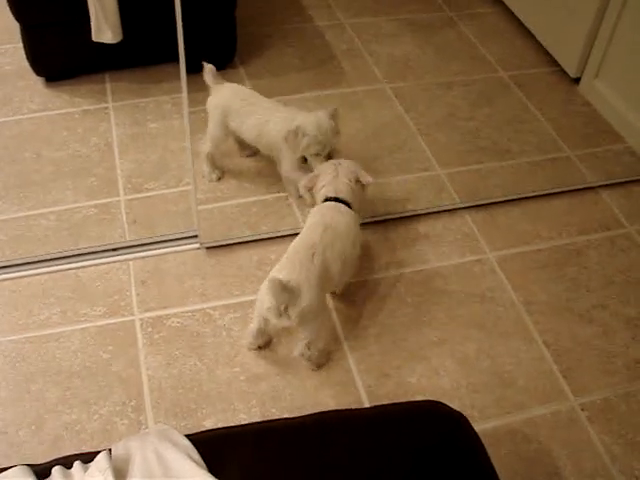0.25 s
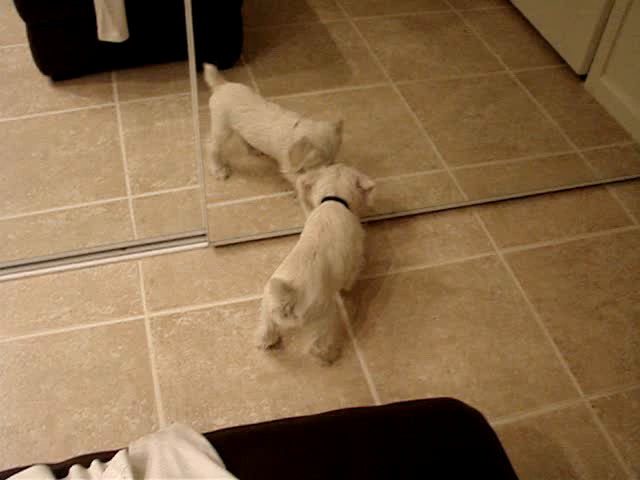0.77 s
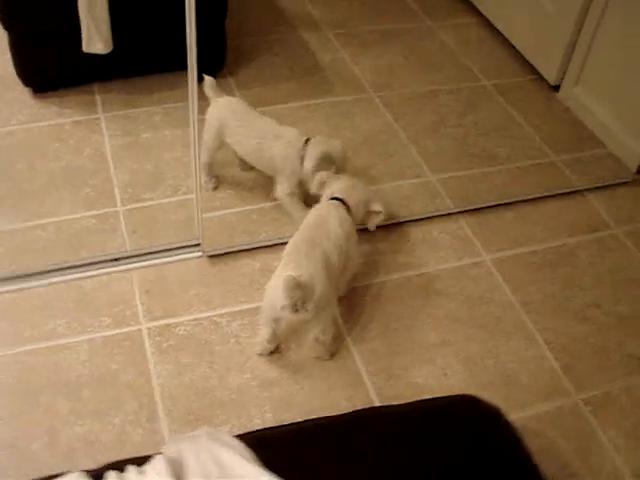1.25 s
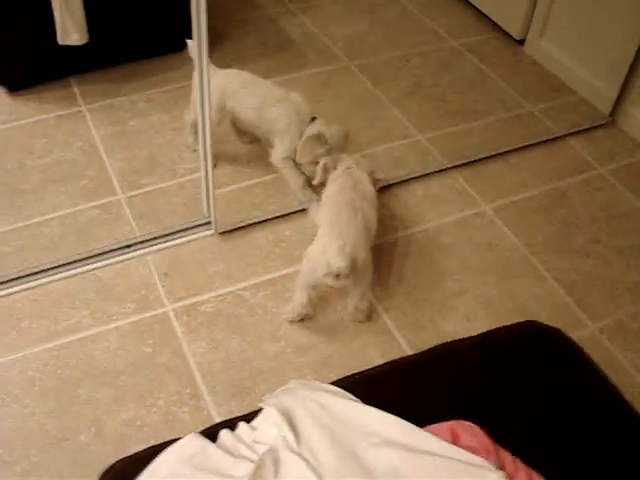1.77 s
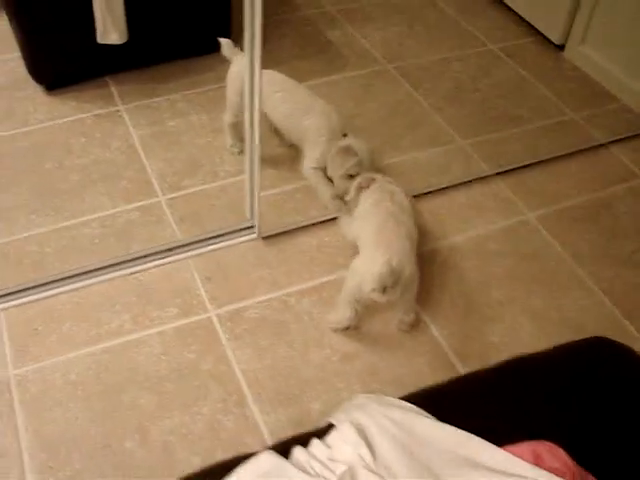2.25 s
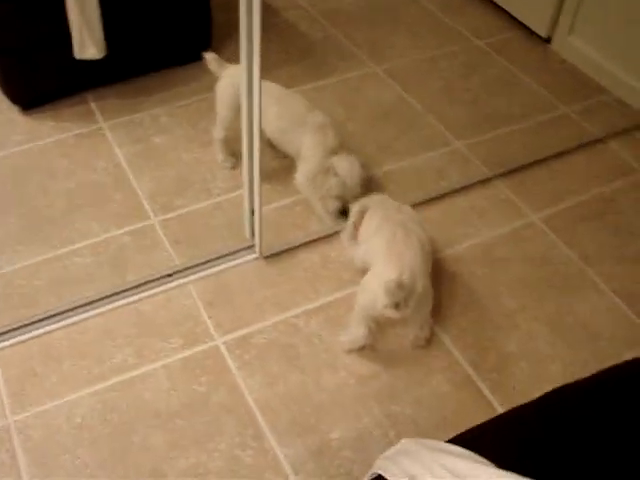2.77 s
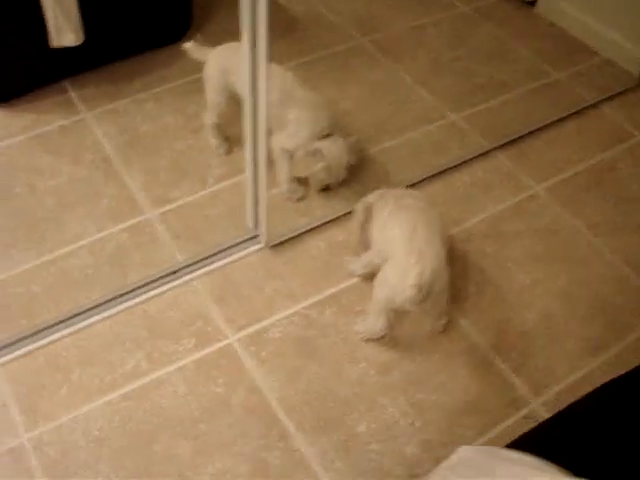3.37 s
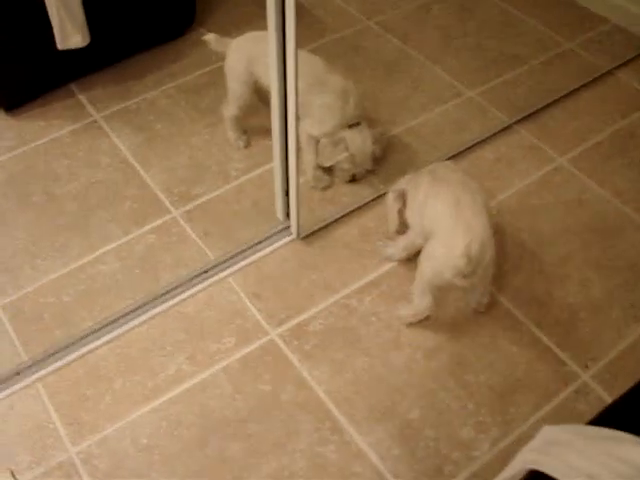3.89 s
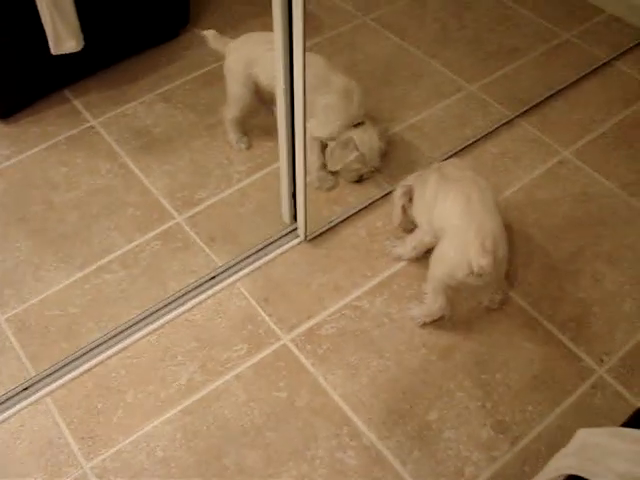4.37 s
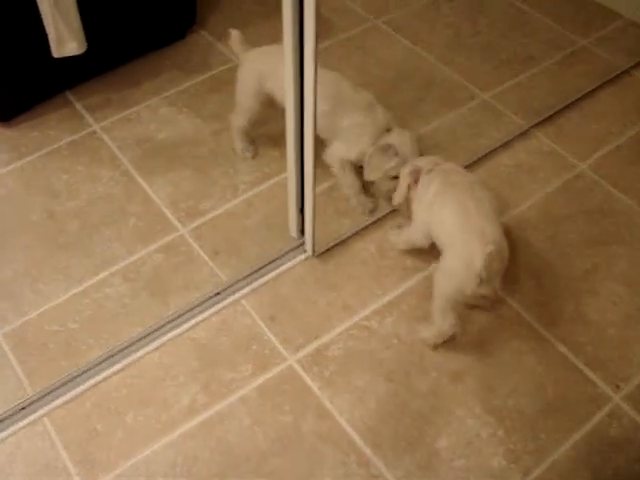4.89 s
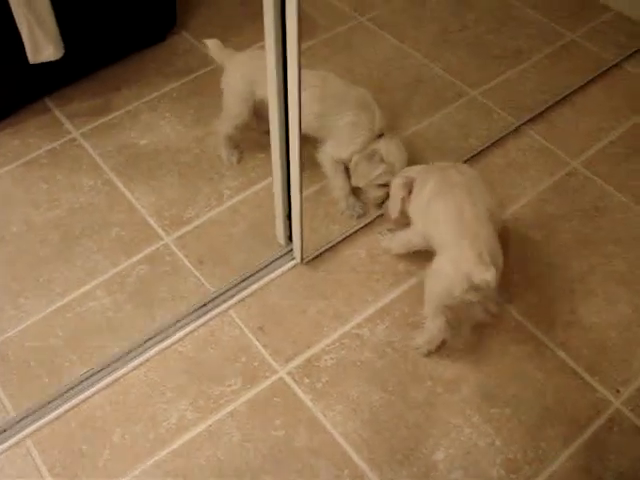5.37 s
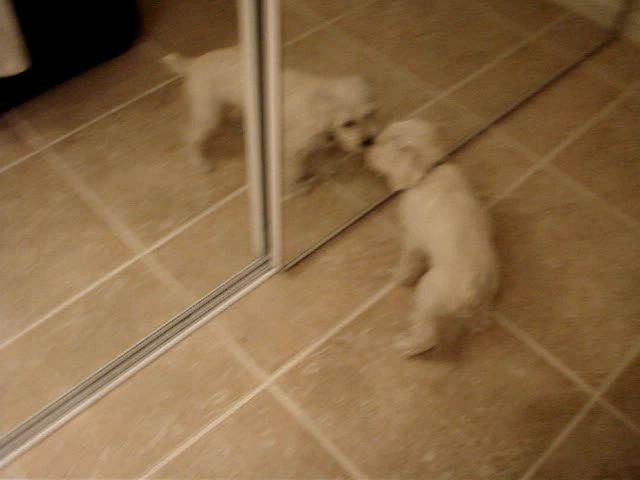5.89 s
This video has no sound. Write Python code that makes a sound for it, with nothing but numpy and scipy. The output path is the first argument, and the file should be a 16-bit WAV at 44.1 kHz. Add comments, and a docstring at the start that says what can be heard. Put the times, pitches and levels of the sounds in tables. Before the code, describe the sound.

Small claws click and scratch on glass in bursts, a dry tick follows, and finally one loud thump rattles the sliding door indoors.

```python
"""A puppy's claws tap and scrape a mirrored sliding door in a small tiled room, then a paw knocks it hard.
Each contact is a landing and small slips that ring modelled glass and scatter off the walls; a heavy paw
rings the panel too. The door shifts and bounces in its track, and one dry tick sounds close by.
Fur and cloth rustle as grainy noise swells over house air drone and the hiss of a small microphone."""
import sys
import numpy as np
from scipy import signal
from scipy.fft import rfft, irfft
from scipy.io import wavfile
from scipy.ndimage import uniform_filter1d

SR = 44100
rng = np.random.default_rng(int(sys.argv[2]) if len(sys.argv) > 2 else 0)


def digitize_waveform(pressure):
    """Quantize a signal to 16-bit integers and store it at the path in sys.argv[1].

    Rows of a 2-D input are taken as channels; values are limited to [-1, 1].
    """
    field = np.atleast_2d(pressure).T
    bounded = np.clip(field, -1, 1)
    quanta = np.round(bounded * 32767).astype(np.int16)
    wavfile.write(sys.argv[1], SR, quanta)


N = 270728  # samples in the scene


def undb(db):
    """Amplitude factor for a level in dB."""
    return 10 ** (np.asarray(db) / 20)


def level(x, db):
    """Scale by x's own RMS, so a steady sound sits at db."""
    return x * undb(db) / np.sqrt(np.mean(x ** 2))


def resonate(x, modes):
    """Sum of two-pole resonances of alternating sign, each with its gain at the centre."""
    out = 0
    for k, (pitch_hz, width_hz, gain_db) in enumerate(modes):
        b, a = signal.iirpeak(pitch_hz, pitch_hz / width_hz, SR)
        out = out + (-1) ** k * undb(gain_db) * signal.lfilter(b, a, x)
    return out


def blow(start_s, level_db):
    """One impulse in silence."""
    x = np.zeros(N)
    x[int(start_s * SR)] = undb(level_db)
    return x


def struck(x, modes):
    """Modes driven by x, scaled so that a single impulse rings with a peak as high as itself."""
    unit_ring = resonate(blow(0, 0)[:SR // 10], modes)
    return resonate(x, modes) / np.abs(unit_ring).max()


def walk(rate_hz):
    """Random levels held for 1 / rate_hz and smoothed twice; spread near 1."""
    hold = int(SR / rate_hz)
    steps = np.repeat(rng.standard_normal(N // hold + 1), hold)
    return 1.6 * uniform_filter1d(uniform_filter1d(steps, hold), hold)[:N]


def air():
    """Shaped noise with duct resonances; the drone below 1.2 kHz wavers, the hiss above hardly does."""
    # broad colour of the air and microphone noise: pitch_hz [Hz], relative density_db [dB per Hz]
    colour = np.array([(12, -45), (20, -19.5), (118, -16.5), (165, -13), (244, -6.5), (468, -4.5),
                       (547, -10.5), (852, -7), (1160, -9.5), (2010, -12), (2540, -14.5), (6500, -18.5),
                       (10100, -24.5), (13200, -107), (22000, -120)])
    # resonances of the duct: pitch_hz [Hz], width_hz [Hz], lift_db [dB]
    duct = [(115.4, 22, 5.5), (266, 18, 3), (480, 30, 4.5), (643, 128, 4), (854, 144, 8), (2054, 75, 6.5)]
    hz = np.maximum(np.arange(N // 2 + 1) * SR / N, 1)
    db = np.interp(np.log(hz), np.log(colour[:, 0]), colour[:, 1])
    for pitch_hz, width_hz, lift_db in duct:
        db = db + lift_db / (1 + (2 * (hz - pitch_hz) / width_hz) ** 2)
    spectrum = rfft(rng.standard_normal(N)) * undb(db)
    out = 0
    draught = walk(7.2)  # shared by all bands; each adds a waver of its own
    # low_hz, high_hz, waver_db
    for low_hz, high_hz, waver_db in [(0, 150, 1.53), (146.6, 600, 1.24), (601.6, 1200, 1.4), (1224, SR, 0.31)]:
        band = irfft(spectrum * (hz > low_hz) * (hz <= high_hz), N)
        out = out + band * undb(waver_db * (draught + 0.75 * walk(11)))
    return level(out, -54.5)


def rustles():
    """Fur and cloth: grainy noise swells, each in its own band, broader the higher it lies."""
    # soft rustles: middle_s [s], length_s [s], centre_hz [Hz], level_db [dB]
    swells = [(1.27, 0.086, 3960, -59.5), (1.569, 0.052, 1290, -55), (2.05, 0.12, 2670, -57.5),
              (2.732, 0.64, 1960, -65), (2.9, 0.12, 4800, -59.5), (3.008, 0.17, 4170, -56),
              (3.395, 0.041, 5000, -58), (3.705, 0.25, 2020, -59.5), (4.406, 0.18, 4940, -62),
              (5.275, .06, 620, -53.5), (5.46, 0.053, 1460, -56)]
    even_hz = 3100  # here the width equals the centre
    narrowest_hz, widest_hz = 450, 6000
    t, out = np.arange(N) / SR, 0
    for middle_s, length_s, centre_hz, level_db in swells:
        grain = rng.standard_normal(N) * undb(1.5 * rng.exponential(size=N))  # uneven grain sizes
        swell = np.exp(-2 * ((t - middle_s) / (length_s / 2)) ** 2)
        width_hz = np.clip(centre_hz * (centre_hz / even_hz) ** 2, narrowest_hz, widest_hz)
        out = out + swell * level(resonate(grain, [(centre_hz, width_hz, 0)]), level_db)
    return out


def tick():
    """A dry tick close to the microphone: a soft contact, so a short rounded push rings a few modes."""
    # the contact: start_s [s], level_db [dB]
    contact = (3.4687, -23)
    # modes of the tick: pitch_hz [Hz], width_hz [Hz], relative gain_db [dB]
    shell = [(1340, 380, 11), (1500, 90, 3), (3900, 900, -3)]
    push_s = .00038
    push = np.hanning(int(push_s * SR))
    return struck(np.convolve(blow(*contact), push / push.sum())[:N], shell)


def door(count=5):
    """A knocked door bounces in its track, sooner and weaker each time; lone nudges ring the same low modes."""
    # low modes of the door: pitch_hz [Hz], width_hz [Hz], relative gain_db [dB]
    low_modes = [(50, 22, -8), (129, 180, -12), (444, 295, -12)]
    # the door shifts in its track: start_s [s], level_db [dB]
    nudges = [(4.775, -54), (5.095, -58), (5.263, -45)]
    first_s, first_db = 4.836, -44.5
    gap_s, gap_shrink, step_db = .043, .86, -.8  # first gap, factor per bounce, level change per bounce
    k = np.arange(count)
    gaps = gap_s * gap_shrink ** k
    times = first_s + np.cumsum(gaps) - gaps
    jolts = list(zip(times, first_db + step_db * k)) + nudges
    return struck(sum(blow(start_s, level_db) for start_s, level_db in jolts), low_modes)


def glass(parts, size=4096):
    """Causal answer of the pane to one jerk: steep-sided modes whose powers add, so no holes open between."""
    hz = np.arange(1, size // 2 + 2) * SR / size
    power = 0
    for part_db, modes in parts:
        for pitch_hz, width_hz, gain_db in modes:
            detune = (hz / pitch_hz - pitch_hz / hz) * pitch_hz / width_hz
            power = power + undb(part_db + gain_db) ** 2 / (1 + detune ** 2) ** 2
    # folding the cepstrum gives minimum phase: the energy comes as early as it can
    cepstrum = irfft(np.log(power) / 2)
    cepstrum[1:size // 2] *= 2
    cepstrum[size // 2 + 1:] = 0
    return irfft(np.exp(rfft(cepstrum)))


def room(push):
    """Direct sound, smeared echoes, then a dense tail, new for every contact; top treble fades separately."""
    # first echoes from floor tiles and near walls: delay_s [s], level_db [dB]
    echoes = [(.0042, -5), (.0098, -7), (.0128, -10), (.0235, -11)]
    smear_s, rise_s = 0.0013, .009
    t60_s, treble_t60_s = .43, 1  # time to fall by 60 dB
    tail_db, treble_db = -1, -14.0  # whole tail, and its treble against the rest at the start
    t = np.arange(len(push)) / SR
    noise = rng.standard_normal(len(push))
    early = np.zeros(len(push))
    early[0] = 1  # direct sound
    for delay_s, level_db in echoes:
        echo = noise * np.exp(-np.abs(t - delay_s) / smear_s)
        early += echo * undb(level_db) / np.sqrt(np.sum(echo ** 2))
    low = signal.sosfiltfilt(signal.butter(2, 6500, fs=SR, output="sos"), noise)
    tail = low * undb(-60 * t / t60_s)
    tail += (noise - low) * undb(treble_db - 60 * t / treble_t60_s)
    tail *= undb(tail_db) / np.sqrt(np.sum(tail ** 2))
    # the diffuse field gathers the energy of all the jerks and forgets their pattern
    gathered = np.sqrt(np.cumsum(push ** 2)) * (1 - np.exp(-(t / rise_s) ** 2))
    return signal.fftconvolve(push, early)[:len(push)] + gathered * tail


def claws(count=28):
    """A claw lands, then slips in small jerks; each rings glass and panel, and the walls scatter the glass."""
    # claw contacts: start_s [s], push_db [dB], weight_db of the paw behind it [dB], middle_db of the middle
    # modes [dB], sharp_db for the sharpness of the nail [dB], scrape_s [s]
    contacts = [(0.127, -9, -21, -15, -10.5, 0.013), (0.134, -6.5, -15.5, -10.5, -36, 0.026),
                (0.4857, -7, -20, -15, -4.5, 0.0075), (0.493, -5.5, -19, -14, -37, 0.017),
                (0.8576, -9, -23, -4, -4, 0.0088), (0.8692, -7.5, -18, -8, -10.5, 0.035),
                (1.03, -17, -11.5, -14, -10, 0.019), (1.735, -18, -21, -18, -9.5, .003),
                (1.7374, -10.5, -20, -8, -36, 0.006), (2.0152, -24, -24, -8, 2, 0.0012),
                (2.2168, -6.5, -17.5, -5, -13, 0.0077), (2.317, -17, -25, -13, -5.5, 0.0034),
                (4.837, -0.2, -1.5, -10, -14.5, 0.0028)]
    # glass modes from low to high, all: pitch_hz [Hz], width_hz [Hz], relative gain_db [dB]
    boom = [(566, 880, -9), (960, 24, 0.5), (1370, 1200, 2.5)]
    clack = [(2050, 1370, 0.5)]
    clink = [(2950, 1370, 1)]
    ring = [(4144, 650, 2), (4600, 2430, -5.5), (5350, 320, -12.5)]
    edge = [(6800, 1270, 0.49), (8200, 2200, -1.2)]
    # long modes of the panel under a heavy paw: pitch_hz [Hz], width_hz [Hz], relative gain_db [dB]
    panel = [(866, 6.8, -13), (1000, 3.6, 1), (1047, 6, -7), (2100, 24, 8)]
    panel_db, slip_db = -39, -3.5  # panel before the paw's weight; largest slip against the push
    skid_db_per_s = -450  # the longer a claw skids, the softer it lands
    clack_db, weight_share = 5.5, 0.72  # the clack lies between boom and clink, so it takes from both
    ring_out_s = .7
    out = np.zeros(N)
    chance = rng.random((len(contacts), 2, count))
    for contact, (when, size) in zip(contacts, chance):
        start_s, push_db, weight_db, middle_db, sharp_db, scrape_s = contact
        push = np.zeros(int(ring_out_s * SR))
        slip_at = (max(scrape_s, 0) * when * SR).astype(int)
        np.add.at(push, slip_at, undb(push_db + slip_db) * (2 * size - 1))
        push[0] += undb(push_db + skid_db_per_s * scrape_s)  # landing
        mixed_db = clack_db + weight_share * weight_db + (1 - weight_share) * middle_db
        pane = glass([(0, ring), (weight_db, boom), (mixed_db, clack), (middle_db, clink), (sharp_db, edge)])
        glass_sound = signal.fftconvolve(room(push), pane)[:len(push)]
        panel_sound = undb(panel_db + weight_db) * struck(push, panel)
        out[int(start_s * SR):][:len(push)] += glass_sound + panel_sound
    return out


def scene():
    """All layers summed into one channel."""
    return (air() + rustles() + tick() + door() + claws())[None]


def record(dry):
    """A steep low-pass cuts the top, over the faint noise of the converter."""
    top_hz, noise_db = 10250, -99  # noise level before its gentle treble roll-off
    cut = signal.sosfilt(signal.ellip(14, .2, 70, top_hz, fs=SR, output="sos"), dry)
    hiss = signal.lfilter([1, .6], 1, rng.standard_normal(dry.shape))
    return cut + undb(noise_db) * hiss


dry = scene()
out = record(dry)
digitize_waveform(out)
```